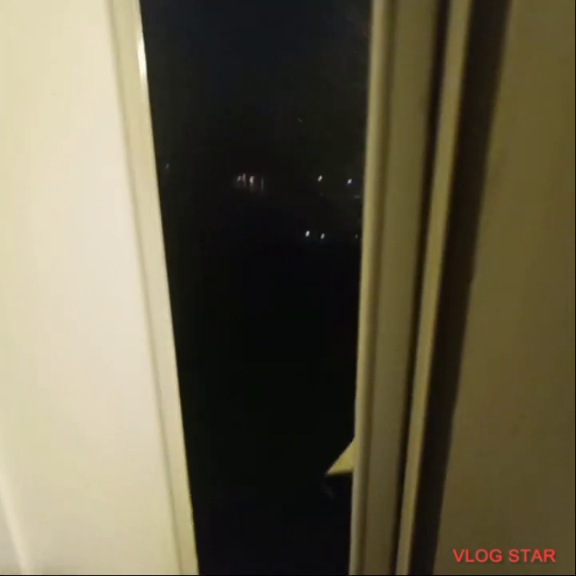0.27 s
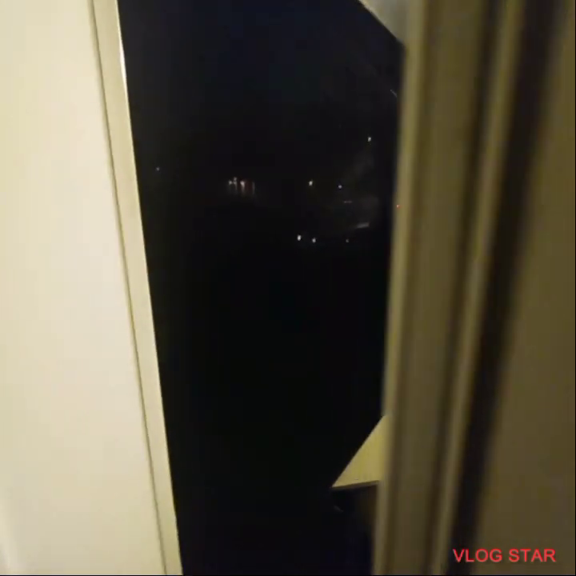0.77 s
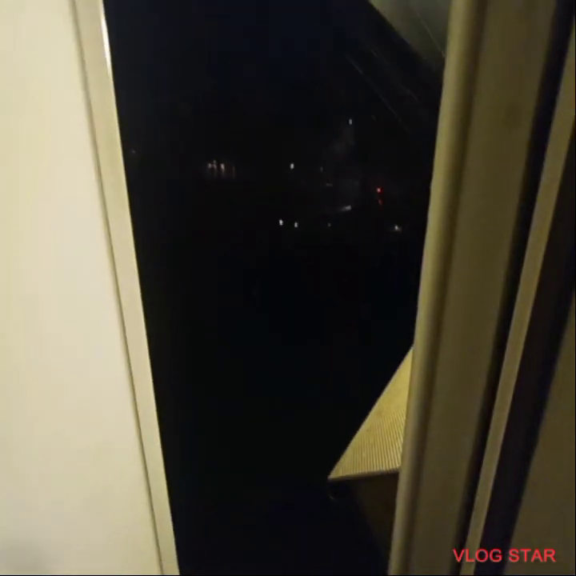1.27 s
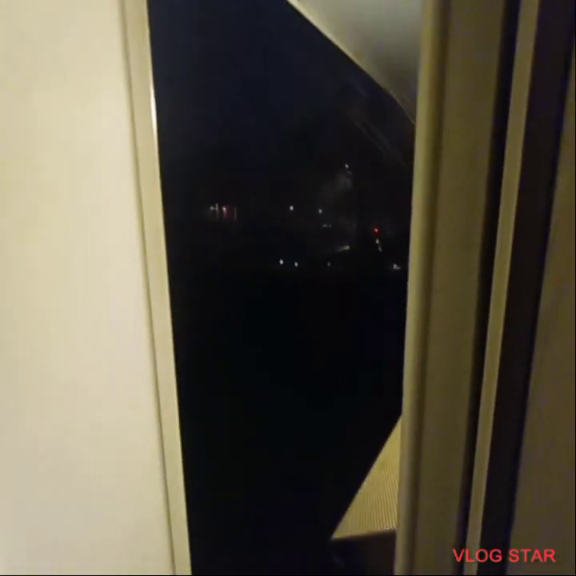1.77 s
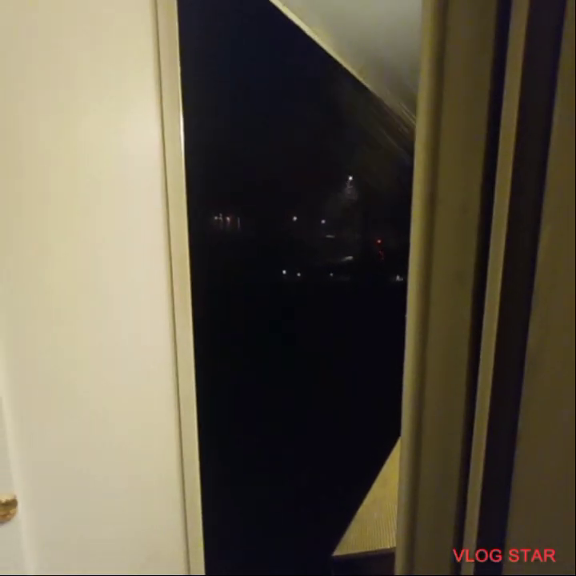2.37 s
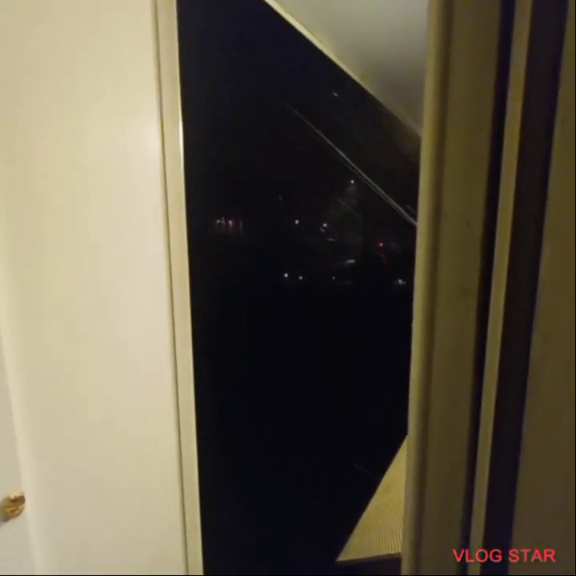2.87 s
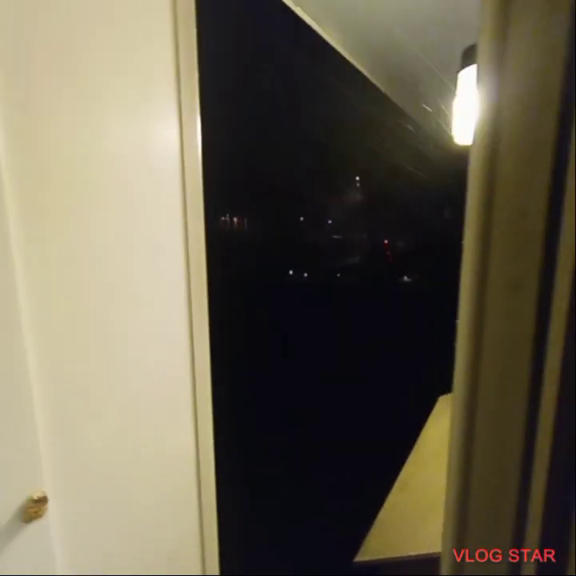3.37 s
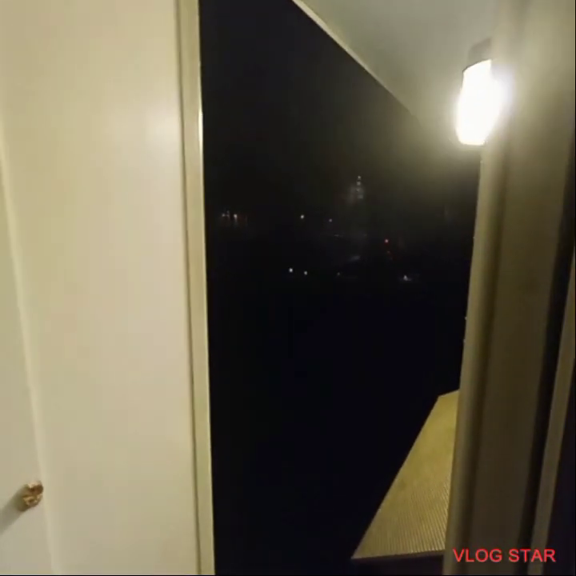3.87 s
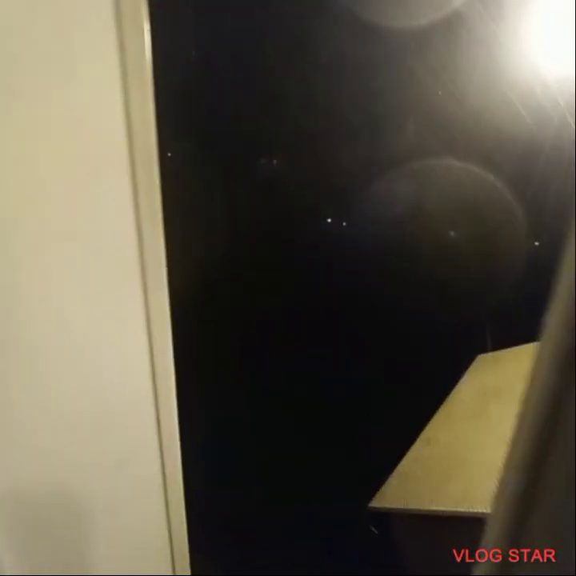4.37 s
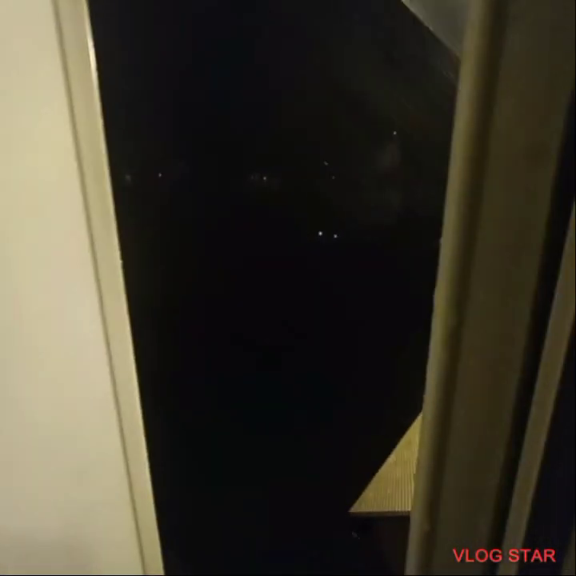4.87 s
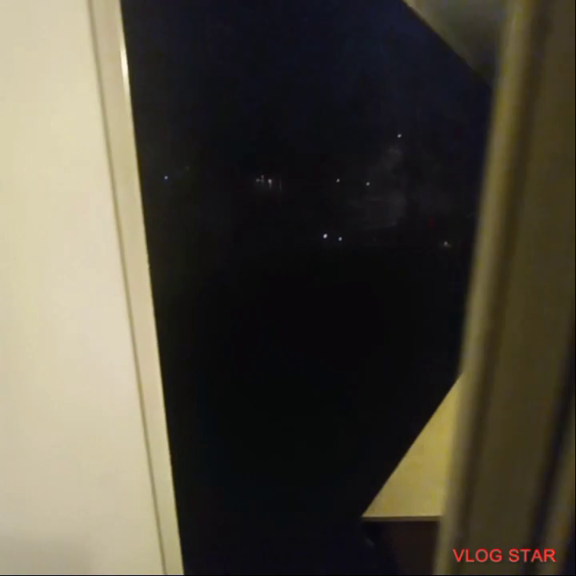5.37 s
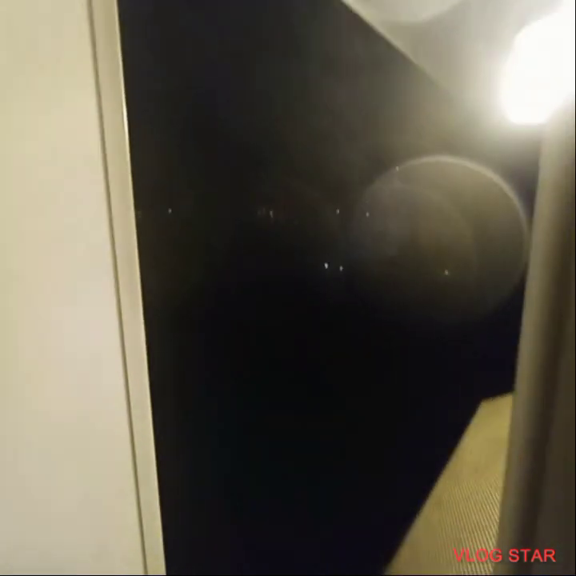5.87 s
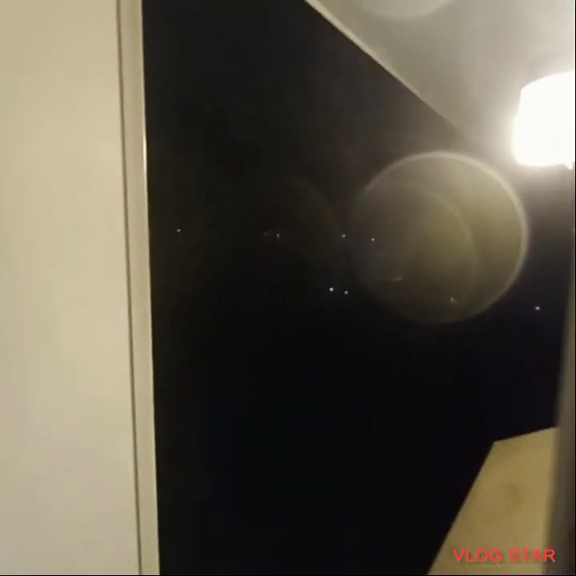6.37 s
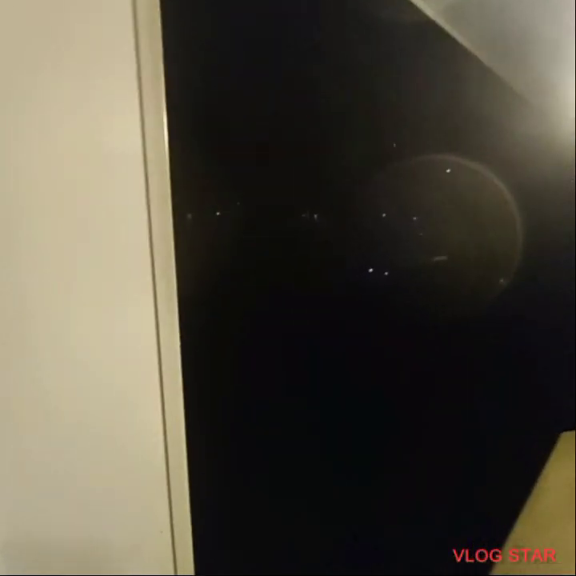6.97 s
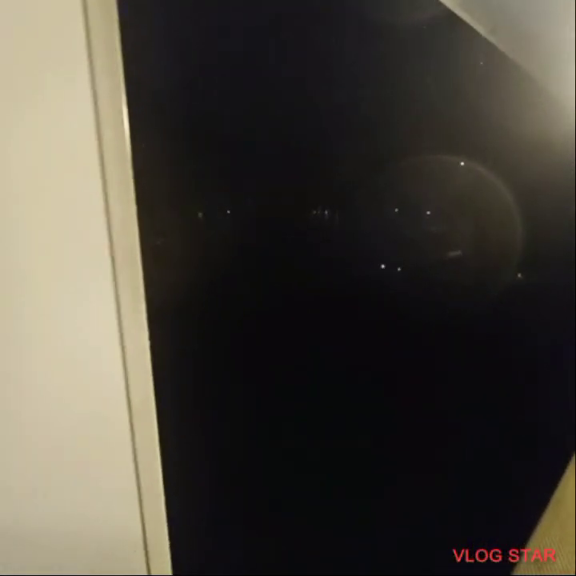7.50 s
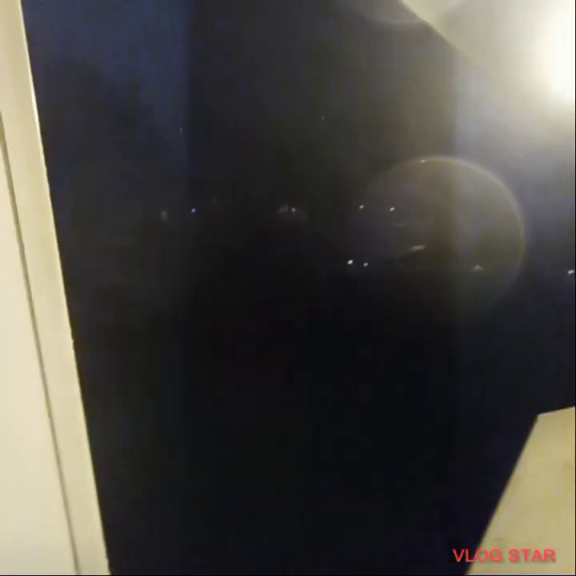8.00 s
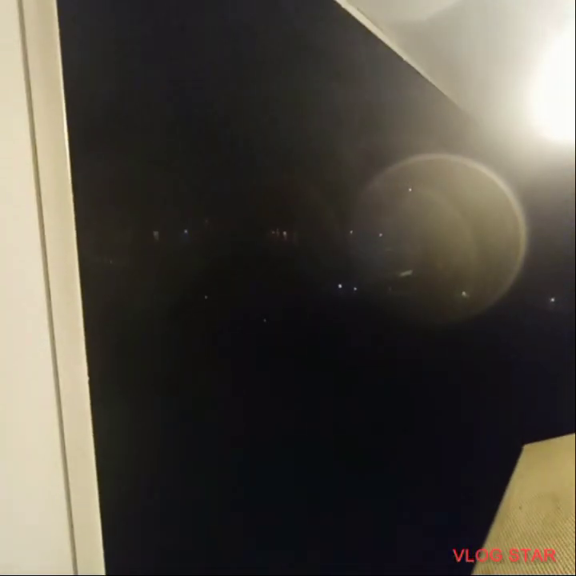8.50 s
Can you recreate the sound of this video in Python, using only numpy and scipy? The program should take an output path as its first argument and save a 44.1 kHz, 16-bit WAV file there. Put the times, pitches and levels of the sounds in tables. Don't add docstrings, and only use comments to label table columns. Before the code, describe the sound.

Heavy rain at night heard by a hand-held phone inside an open window: a smooth distant wash over a low booming storm roar, with barely a drop or two standing out. A faint low room hum wavers midway. Sound stops dead for about half a second, then quickly fades in nearer the gap, with grainier patter, splashes and crisp drops cracking on the sill.

```python
import sys
import numpy as np
from scipy import signal
from scipy.fft import rfft, irfft, next_fast_len
from scipy.io import wavfile
from scipy.ndimage import uniform_filter1d, map_coordinates

SR = 44100
rng = np.random.default_rng(int(sys.argv[2]) if len(sys.argv) > 2 else 0)


def dump(signal):
    limited = np.clip(np.atleast_2d(signal).T, -1, 1)
    pcm = np.round(limited * 32767).astype(np.int16)
    wavfile.write(sys.argv[1], SR, pcm)


def field_ratio(decibels):
    return 10 ** (np.asarray(decibels, dtype=float) / 20)


N = 385434
CUT_S, RESUME_S, FADE_S = 4.257, 4.7035, 0.29


def unit(x):
    return x / np.sqrt(np.mean(x ** 2) + 1e-20)


def along(points, hz):
    f, v = np.transpose(points)
    return np.interp(np.log(hz + 1), np.log(f + 1), v)


def curves(tables):
    s, *cols = np.transpose(np.vstack(tables))
    return [np.interp(np.arange(N) / SR, s, c) for c in cols]


def wobble(rate):
    knots = rng.standard_normal(int(N * rate / SR) + 4)
    return map_coordinates(knots, [np.arange(N) * rate / SR])


def filtered(x, response):
    m = 2 * next_fast_len(N // 2 + 8192)
    return irfft(rfft(x, m) * response(np.fft.rfftfreq(m, 1 / SR)), m)[..., :N]


def causal(db):
    cep = irfft(np.log(field_ratio(db)))
    half = cep.shape[-1] // 2 - 1
    fold = np.r_[1, np.full(half, 2), 1, np.zeros(half)]
    return np.exp(rfft(cep * fold))


def low(hz, edge_hz, steep):
    return (1 + (hz / edge_hz) ** steep) ** -.5


def high(hz, edge_hz, steep):
    return np.sqrt(1 - low(hz, edge_hz, steep) ** 2)


def coloured(x, bumps):
    return filtered(x, lambda hz: field_ratio(sum(db * np.exp(-((hz - c) / w) ** 2) for c, w, db in bumps)))


def patchy(depth_db):
    z = signal.stft(rng.standard_normal((2, N)), nperseg=512)[2]
    field = uniform_filter1d(rng.standard_normal(z.shape[1:]), size=8, axis=0)
    field = uniform_filter1d(field, size=12, axis=1)
    return unit(signal.istft(z * field_ratio(depth_db * unit(field)), nperseg=512)[1][:, :N])


def roar(spectrum, level_db):
    # (frequency [Hz], left-right likeness [0-1])
    alike = [(60, 0.95), (140, 1), (210, 0.87), (290, 0.97), (400, 0.5), (500, 0.05)]
    # (frequency [Hz], left over right [dB])
    lean = [(60, -1.5), (150, 0.2), (220, 1), (340, 4), (450, -2)]

    def mid_side(hz):
        turn = np.arccos(np.clip(along(alike, hz), -1, 1)) / 2
        return field_ratio(along(spectrum, hz)) * [np.cos(turn), np.sin(turn)]

    mid, side = filtered(patchy(depth_db=-1.13), mid_side)
    pair = np.array([mid + side, mid - side])
    pair = filtered(pair, lambda hz: field_ratio(along(lean, hz) * [[.5], [-.5]]))
    return field_ratio(level_db + 0.27 * wobble(11)) * unit(pair)


def drone():
    # (time [s], pitch [Hz], level [dB])
    mode = [
        (2.5, 153, -42),
        (2.592, 150.7, -48),
        (2.94, 143.7, -38.5),
        (3.178, 151, -46),
        (3.226, 157.6, -62),
        (3.482, 158, -50),
        (3.526, 149.9, -40),
        (4.128, 154.7, -41.5),
        (4.24, 143, -41),
    ]
    hz, db = curves([mode])
    t = np.arange(N) / SR
    rise = np.clip(t - mode[0][0], 0, .5) * 2
    rise = rise * (np.arange(N) < (CUT_S + .1) * SR)
    return np.sqrt(2) * rise * field_ratio(db + 1.2 * wobble(12)) * np.sin(2 * np.pi * np.cumsum(hz) / SR)


def echoed(x):
    # (delay [s], level [dB])
    echoes = [
        (.0014, -6),
        (.0048, -8),
        (.0125, -12),
    ]
    port_delay = np.array([[1], [.8]])
    return filtered(x, lambda hz: 1 + sum(field_ratio(db) * np.exp(-2j * np.pi * hz * s * port_delay) for s, db in echoes))


def drops():
    # (time [s], peak [dB], brightness [dB], spray left over right [dB])
    sill_drops = [(0.084, -45, 4, -16), (1.3279, -37, 0, 0), (4.9742, -21, -14, 0), (5.1665, -25, -12, -4),
                  (5.2923, -27, -1, 7), (5.417, -27, -5, -13), (5.7135, -23, -8, 5), (5.9953, -42, 10, -10),
                  (6.0594, -42, 14, -12), (6.0809, -22, -23, 4), (6.2291, -22, -11, -4),
                  (6.2535, -24, -8, 6), (6.2761, -21, -24, 8), (6.3284, -19, -24, 1),
                  (6.3937, -25, -17, -8), (6.4141, -18, -15, 4), (6.4391, -21, -19, 7),
                  (6.8084, -22, -19, 7), (6.8398, -29, -4, -10), (6.9955, -26, -8, -9),
                  (7.1059, -21, -17, -1), (7.1435, -11.5, -17, -3), (7.233, -17.5, -24, 0),
                  (7.4653, -22, -10, -3), (7.5513, -34, 0, -12), (7.6934, -27, -6, -11),
                  (7.7405, -27, -14, -9), (7.8402, -26, 1, 9), (8.0141, -24, -8, 5), (8.3486, -27, -6, 11)]
    # (time [s], peak [dB], pitch [Hz])
    plops = [
        (0.954, -32, 1950),
        (6.393, -31, 4700),
        (6.81, -29, 4600),
        (6.988, -29, 1640),
        (7.029, -28.5, 1250),
        (7.84, -27, 5600),
    ]
    # (time [s], peak [dB], pitch [Hz])
    splashes = [
        (4.807, -28.5, 1580),
        (4.912, -34, 2190),
        (4.934, -33.5, 2820),
        (4.959, -29.5, 2100),
        (4.974, -29.5, 1600),
        (5.04, -33, 2080),
        (5.338, -35, 790),
        (5.337, -31.5, 1010),
        (6.995, -29, 1570),
        (7.031, -39, 1200),
    ]
    # (left port [dB], right port [dB])
    blow_db = [
        [[5], [13]],
        [[17], [12.5]],
    ]
    plop_kind, splash_kind = (2.5, .016, .9, -3), (3, .063, .16, -1)
    sill_lean_db, sill_follows = 11, .3

    strays = 36
    when = rng.uniform(RESUME_S + FADE_S, N / SR, strays)
    strays = np.c_[when, rng.normal([-30, -10, 0], [2.5, 3, 6], (strays, 3))]

    parts = np.zeros((3, 2, N + SR))
    t = np.arange(3000) / SR
    for s, db, bright_db, side_db in np.vstack([sill_drops, strays]):
        crack = field_ratio(-60 * t / .009) * ((t == 0) + .16 * rng.standard_normal((2, len(t))))
        tap_db = [0, sill_follows * -side_db - sill_lean_db]
        spray_db = [bright_db + side_db / 2, bright_db - side_db / 2]
        peaks_db = db + np.array([tap_db, spray_db])[..., None]
        parts[1:, :, round(s * SR):][..., :len(t)] += field_ratio(peaks_db + blow_db) * crack

    fat = [(*row, *plop_kind) for row in plops] + [(*row, *splash_kind) for row in splashes]
    for s, db, hz, pan_db, t60, ring, spray_db in fat:
        start = round(s * SR)
        place = field_ratio(db - 1.5 - 60 * t / t60) * field_ratio([[pan_db / 2 - 1.5], [1.5 - pan_db / 2]])
        parts[0, :, start:][:, :len(t)] += ring * np.sin(2 * np.pi * hz * t) * place
        spray = low(hz, 3300, 8) * field_ratio(spray_db) * field_ratio([[[4.5]], [[-8]]])
        parts[:2, :, start:][..., :len(t)] += spray * rng.standard_normal((2, len(t))) * place

    def bands(hz):
        middle = high(hz, 850, 8) * low(hz, 4200, 5)
        upper = high(hz, 4600, 8) * low(hz, 8400, 16)
        return np.array([middle, upper, high(hz, 8800, 18)])[:, None]

    return echoed(filtered(parts[..., :N], bands).sum(0))


def patter(count, spread_db, life_s):
    when, size, side = rng.random((count, 3)).T
    power = field_ratio(-2 * spread_db * np.log(1 - .995 * size))
    hits = [np.bincount((when * N).astype(int), power * share, N) for share in (side, 1 - side)]
    splash = field_ratio(-120 * np.arange(400) / SR / life_s)
    power = abs(signal.fftconvolve(hits, splash[None], axes=1)[:, :N])
    return unit(np.sqrt(power) * rng.standard_normal((2, N)))


def rain(far_db, near_db):
    far = filtered(patchy(depth_db=0.84), lambda hz: low(hz, edge_hz=3030, steep=2.11))
    grains = 0.55 * patchy(depth_db=2.0) + 0.37 * patter(count=9000, spread_db=3.0, life_s=0.0047)
    near = filtered(grains, lambda hz: high(hz, edge_hz=8500, steep=1.64))
    flurry_db = 1.1 * wobble(13) + .7 * wobble(26)
    return field_ratio(far_db + 9.0 + 0.14 * wobble(11)) * far + field_ratio(near_db + 9.5 + flurry_db) * near


def through_ports(wet):
    # (frequency [Hz], gain [dB])
    left_port = [(500, 10.5), (1050, 0.2), (1500, 4), (2100, 3), (4500, 3), (5700, 6), (6650, 13.5),
                 (7300, 11), (8100, -2.5), (10000, -9.5), (11200, -19.5), (13750, -10), (14600, -2.5),
                 (15600, 5.5)]
    # (frequency [Hz], gain [dB])
    right_port = [(500, 11), (620, 8), (1250, 0.26), (2500, -0.7), (4000, 1.5), (6500, -1), (8000, -6.5),
                  (9300, -1), (10500, 3.5), (12000, -3), (13700, -9.5), (14600, 2.6), (15700, 0.5)]

    def ports(hz):
        gain_db = np.array([along(left_port, hz), along(right_port, hz)])
        return causal(gain_db) * high(hz, edge_hz=478, steep=9.2)

    return filtered(wet, ports)


def scene():
    # (time [s], rainfall [dB], storm rumble [dB])
    storm = [
        [(0, -46, -37.5), (.3, -46.5, -40.5), (.8, -48, -38.5), (1.4, -48, -39), (1.9, -47.5, -38),
         (2.2, -47, -41), (2.7, -46, -38), (3.2, -45.5, -38.5), (4.24, -46.5, -39.5)],
        [(4.9, -44, -36.5), (5.3, -45, -41), (5.7, -46, -38), (6.3, -46.5, -38), (6.8, -46.5, -34.5),
         (7.3, -47.5, -43), (7.7, -46.5, -34), (8.3, -47, -38), (8.73, -47, -36.5)],
    ]
    # (frequency [Hz], density [dB per Hz])
    boom_spectrum = [(12, -71), (20, -34.5), (37, -26), (81, -8), (125, -3), (153, -0.5), (175, -3.5),
                     (210, -5), (260, -46.5), (400, -120)]
    # (frequency [Hz], density [dB per Hz])
    roar_spectrum = [(100, -120), (150, -7.5), (190, -9), (230, -1.5), (275, -1), (334, -2), (363, -6.5),
                     (560, -20.5), (730, -38), (1230, -120)]
    # (frequency [Hz], width [Hz], gain [dB])
    indoors = [(720, 110, 4.5), (996, 93, 3.5), (1774, 420, 3.5), (1350, 270, -1)]
    # (frequency [Hz], width [Hz], gain [dB])
    nearing = [(650, 180, -2), (1900, 400, 3.5)]
    settle_s = 1.3

    rain_db, rumble_db = curves(storm)
    t = np.arange(N) / SR
    first = np.arange(N) < CUT_S * SR
    wet = rain(rain_db + 2, rain_db + np.where(first, -14, 2)) + drops()
    settled = np.clip((t - RESUME_S) / settle_s, 0, 1) ** 2
    at_gap = settled * wet + (1 - settled) * coloured(wet, nearing)
    wet = np.where(first, coloured(wet, indoors), at_gap)
    roar_db = -36.5 + .2 * (rumble_db - rumble_db.mean())
    storm_bed = roar(boom_spectrum, rumble_db + 0.5) + roar(roar_spectrum, roar_db)
    return storm_bed + drone() + through_ports(wet)


def starved(x, floor_db, scatter_db):
    hz, _, z = signal.stft(x, SR, nperseg=2048)
    z = z * (hz < 15790)[:, None]
    bins = 24
    band = np.arange(len(hz)) // bins
    starts = np.flatnonzero(np.diff(band, prepend=-1))
    power = np.add.reduceat(abs(z) ** 2, starts, axis=1) / bins
    scatter = unit(uniform_filter1d(rng.standard_normal(power.shape), size=3))
    keep = power > field_ratio(2 * (floor_db + scatter_db * scatter))
    kept = z * (keep[:, band] | (hz[:, None] < 7500))
    return signal.istft(kept, SR, nperseg=2048)[1][:, :N]


def band_limit(x):
    return signal.sosfilt(signal.butter(12, 17110, fs=SR, output="sos"), x)


def record(dry):
    t = np.arange(N) / SR
    fade = np.clip(0.07 + (t - RESUME_S) / FADE_S, 0, 1) * (t > RESUME_S)
    heard = dry * fade + dry * (t < CUT_S + .1)
    heard = starved(heard, floor_db=-91.5, scatter_db=3.5)
    ramp = np.clip(np.maximum(CUT_S - t, t - RESUME_S) / .001, 0, 1)
    return band_limit(heard * ramp)


dry = scene()
out = record(dry)
dump(out)
```